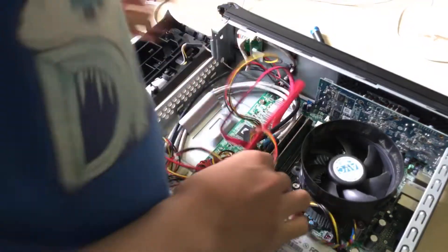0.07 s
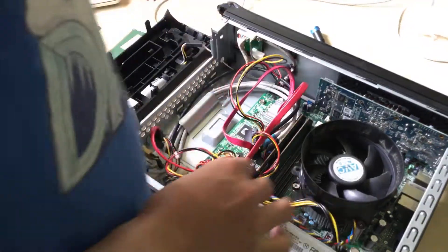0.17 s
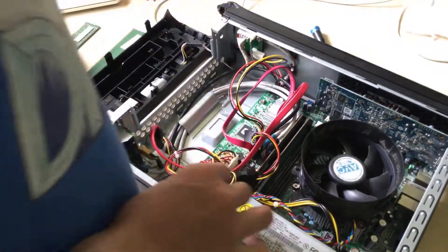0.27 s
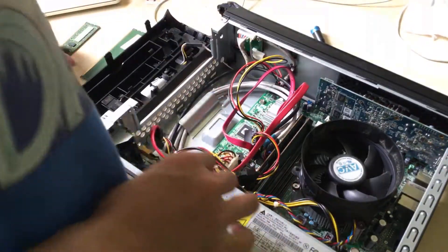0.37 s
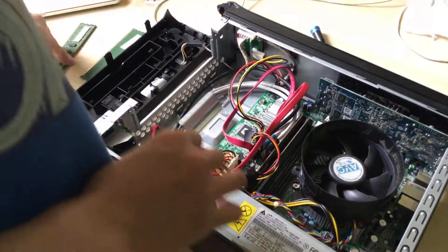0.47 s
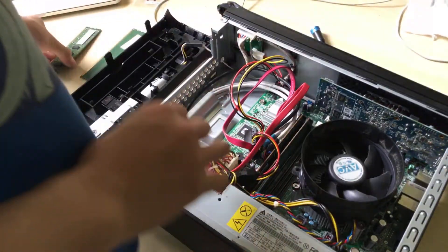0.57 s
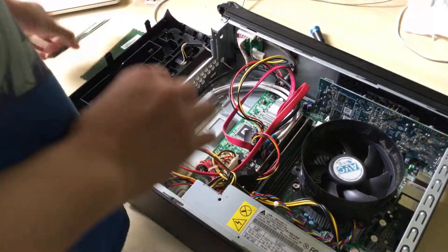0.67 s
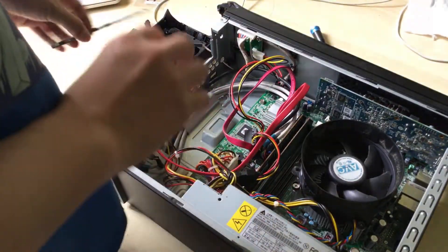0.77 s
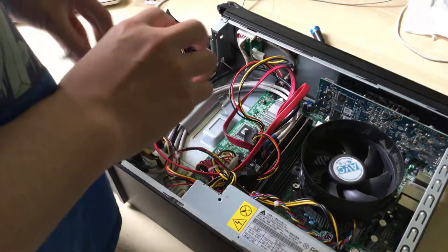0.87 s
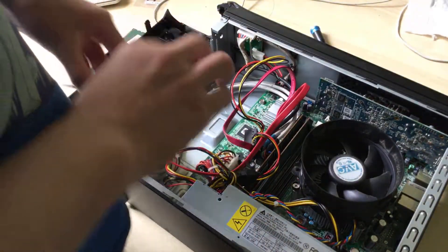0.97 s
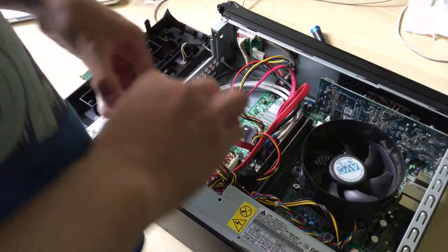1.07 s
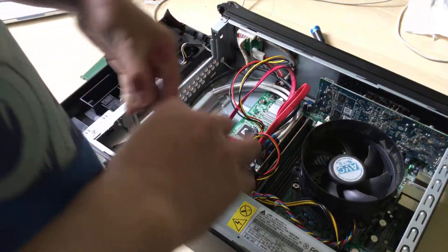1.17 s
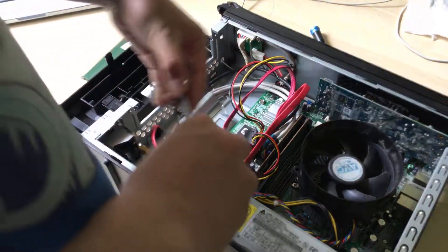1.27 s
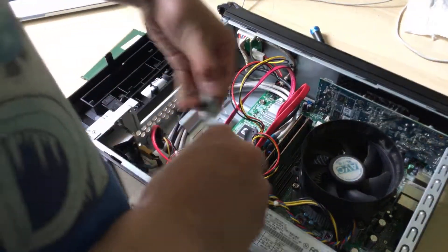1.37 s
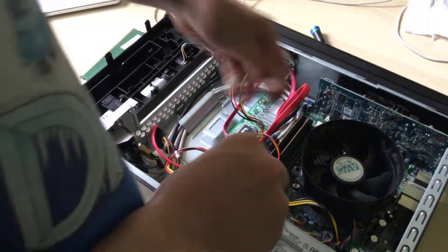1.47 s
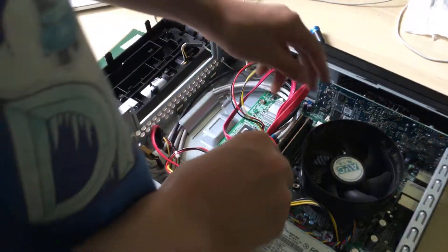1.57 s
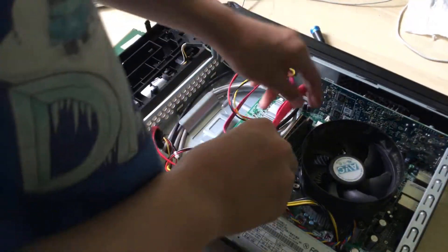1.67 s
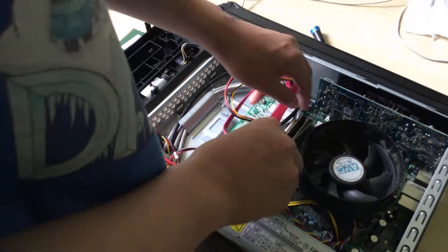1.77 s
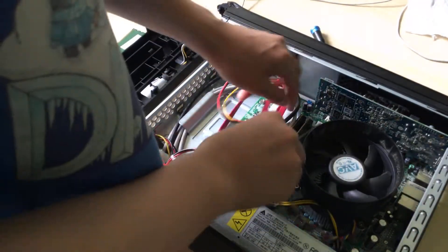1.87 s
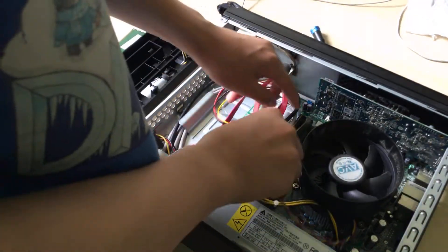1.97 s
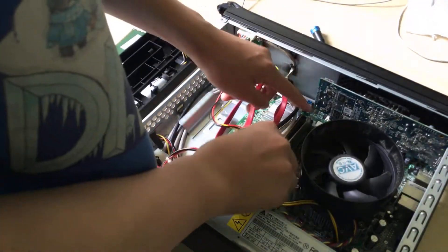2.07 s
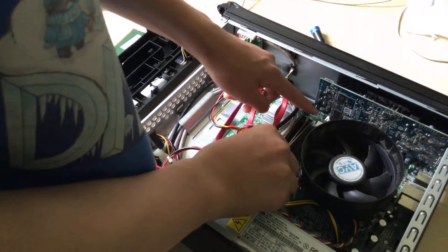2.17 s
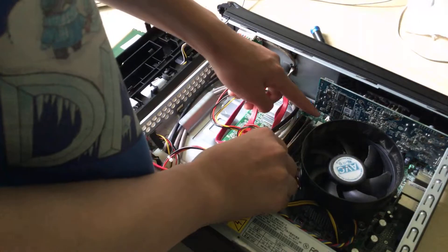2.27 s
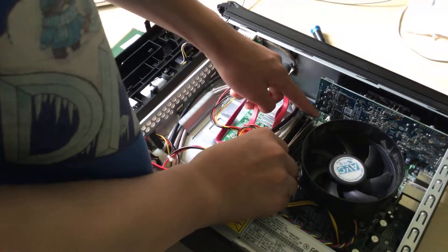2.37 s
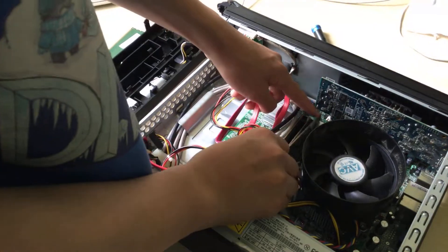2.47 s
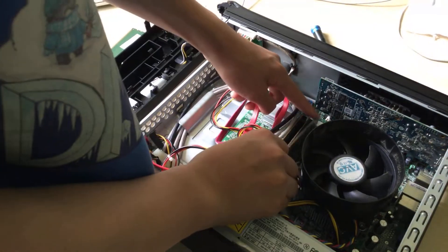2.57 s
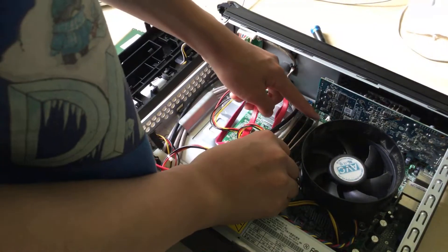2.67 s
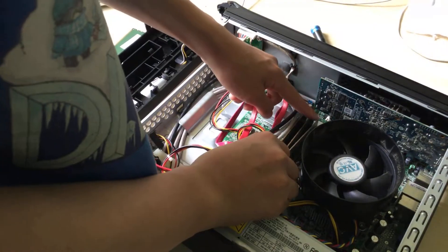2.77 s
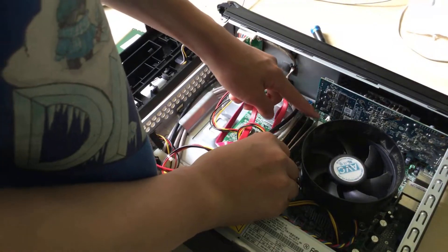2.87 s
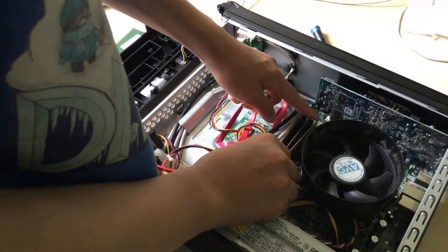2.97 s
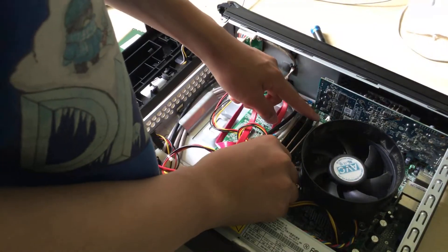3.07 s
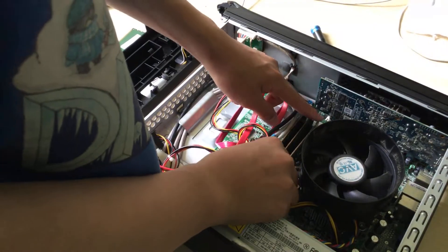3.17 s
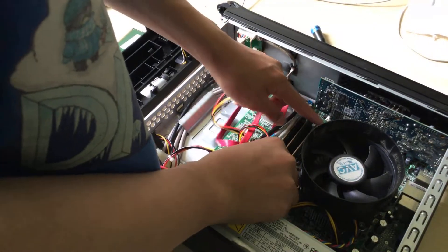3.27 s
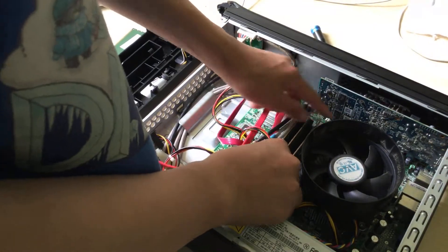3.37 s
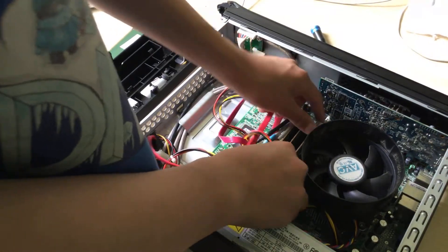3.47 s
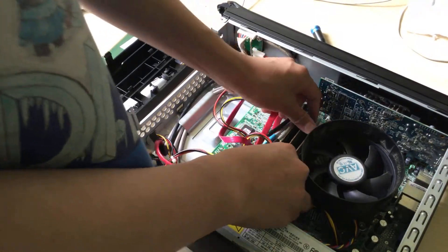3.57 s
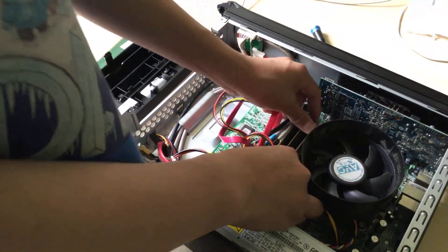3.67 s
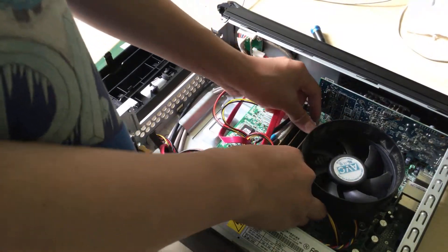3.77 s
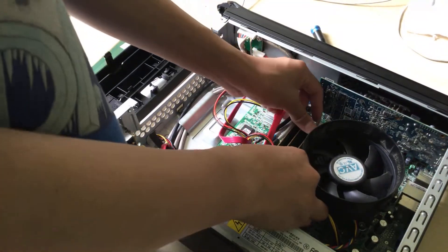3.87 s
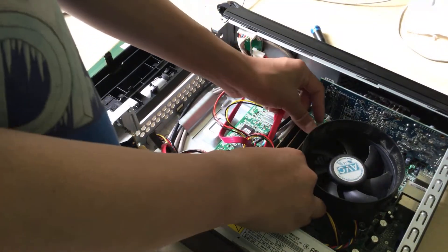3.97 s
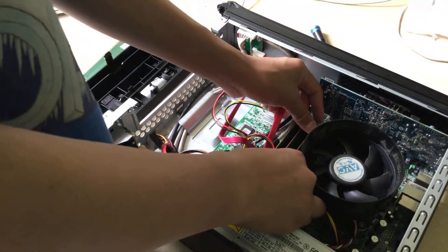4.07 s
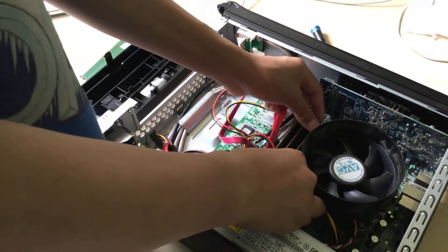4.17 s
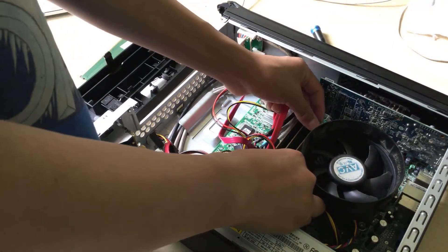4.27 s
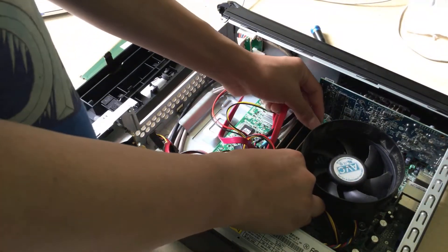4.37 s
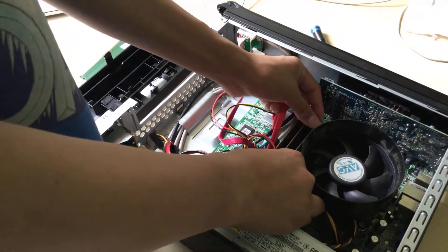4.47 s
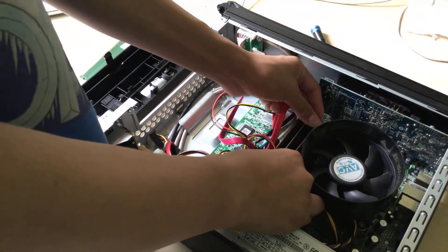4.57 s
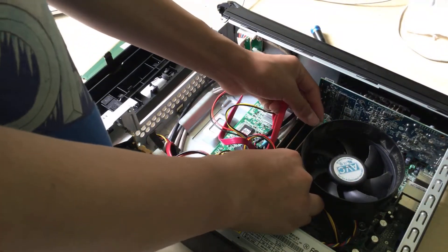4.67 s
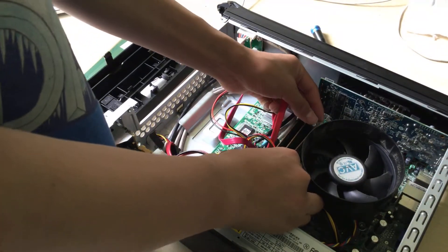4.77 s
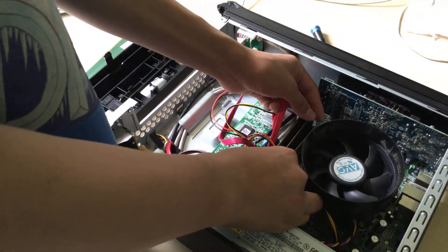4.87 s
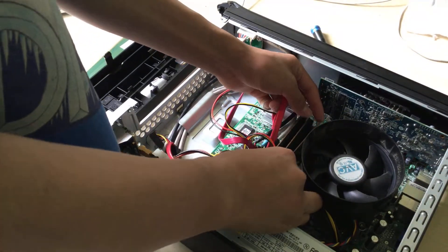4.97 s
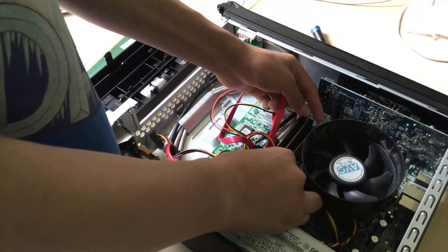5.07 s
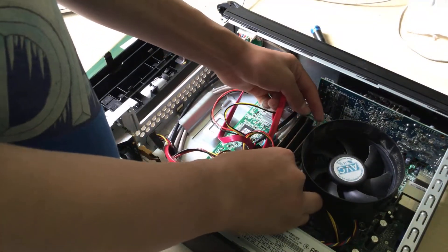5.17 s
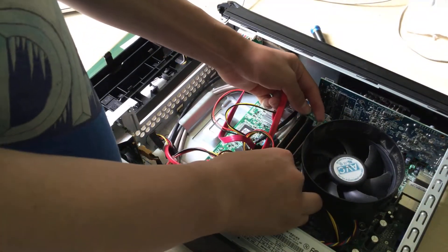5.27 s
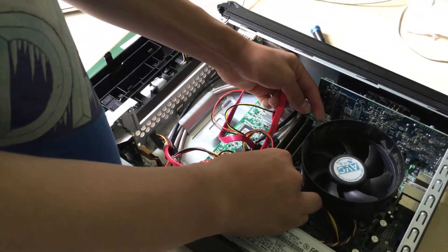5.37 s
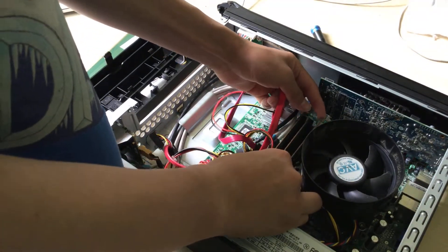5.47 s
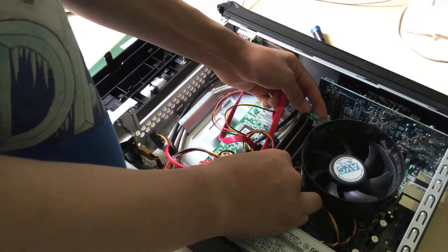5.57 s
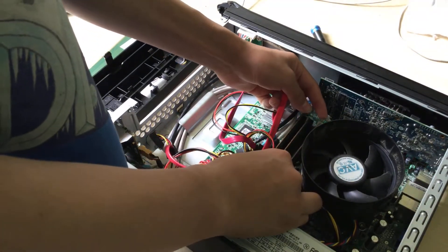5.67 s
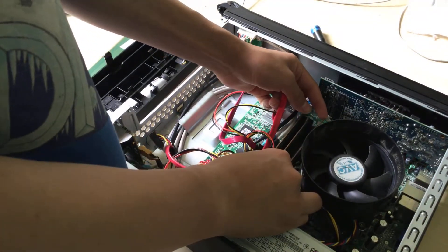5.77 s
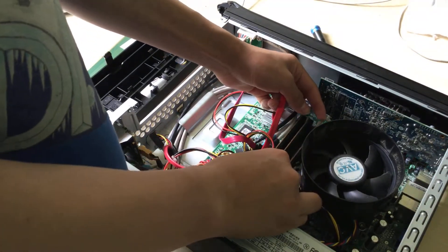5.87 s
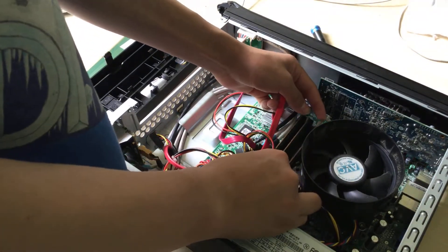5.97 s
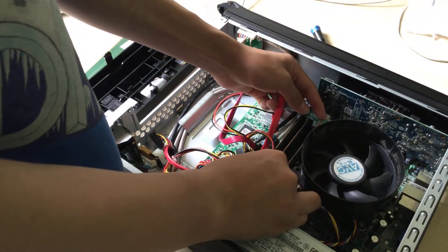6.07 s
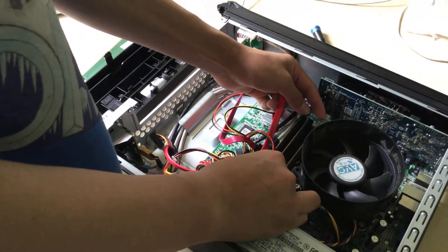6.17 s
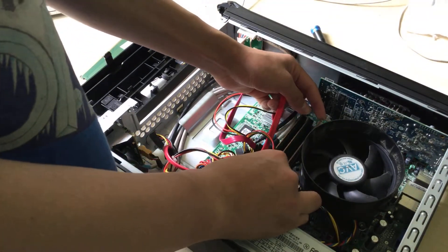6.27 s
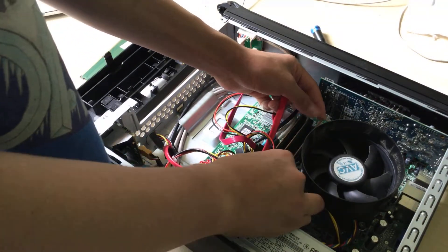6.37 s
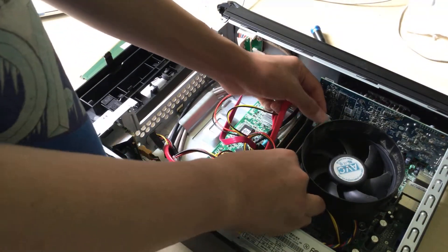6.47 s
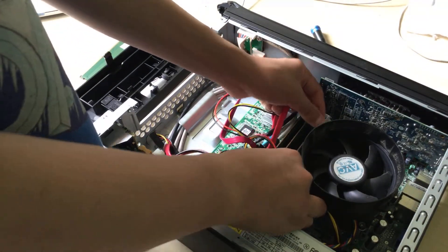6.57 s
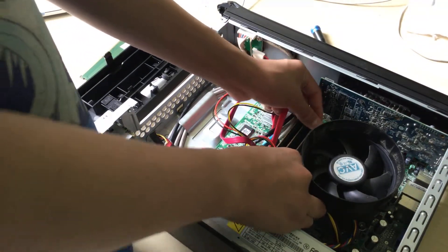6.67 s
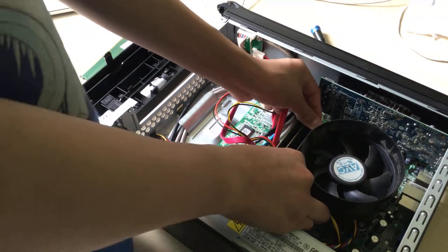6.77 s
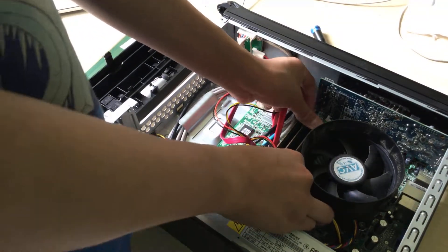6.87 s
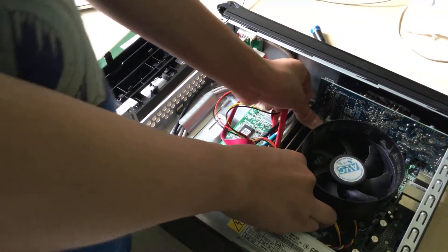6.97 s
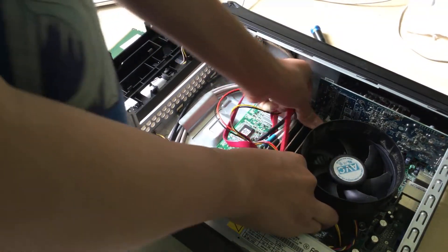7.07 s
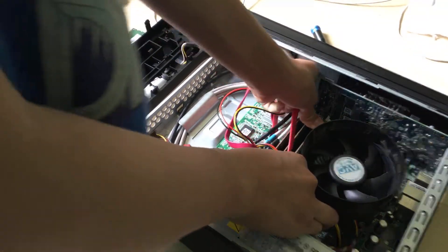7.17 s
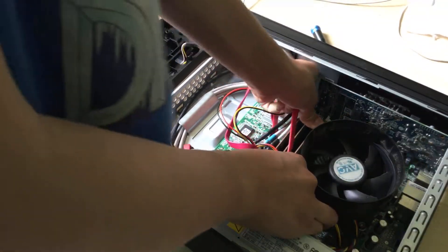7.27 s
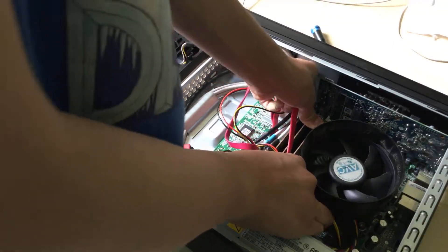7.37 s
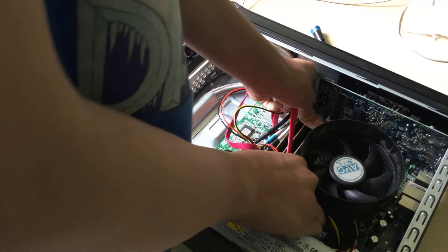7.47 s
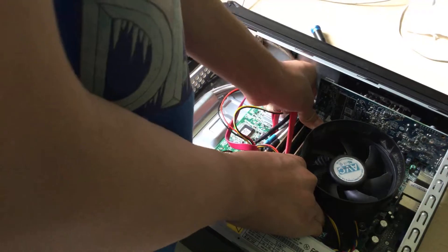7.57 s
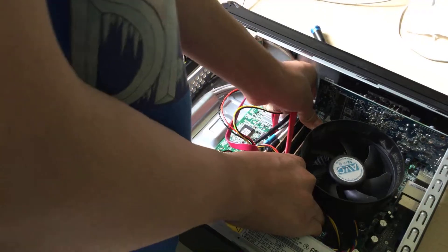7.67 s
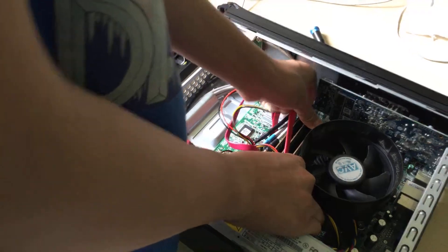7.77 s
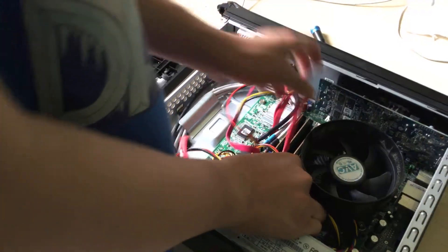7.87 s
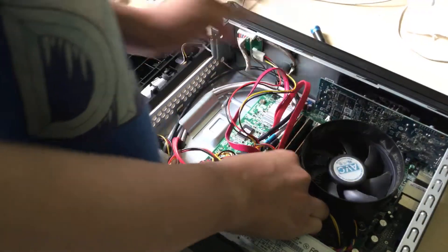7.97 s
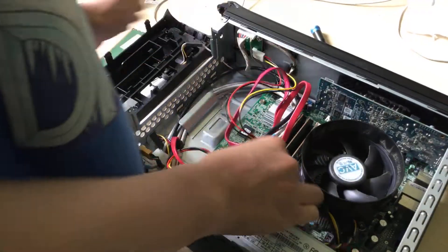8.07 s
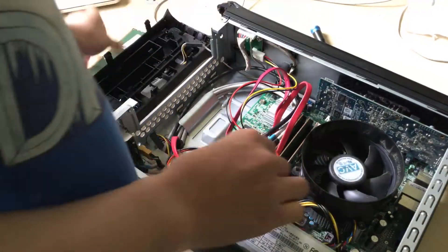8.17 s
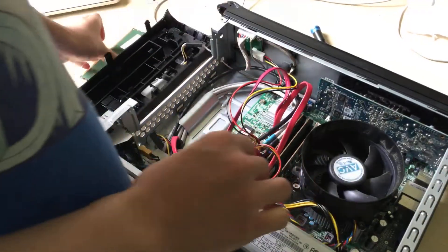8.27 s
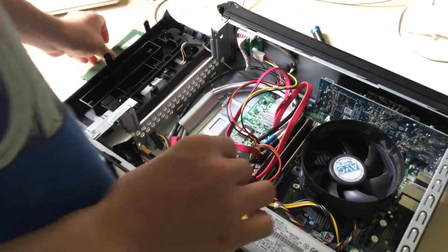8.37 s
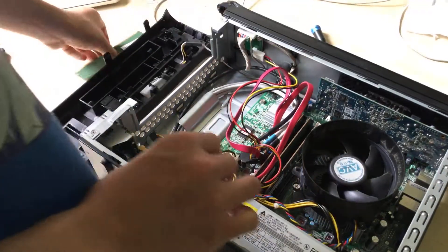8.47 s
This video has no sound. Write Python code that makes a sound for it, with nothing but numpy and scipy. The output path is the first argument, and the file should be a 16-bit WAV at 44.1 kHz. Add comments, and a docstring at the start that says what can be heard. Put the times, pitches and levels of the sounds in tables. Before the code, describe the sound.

Sharp plastic clicks and board knocks at irregular intervals in a quiet room, ending with two very loud snaps and a small rattly clatter.

```python
"""Quiet room, desk, open computer case: memory sticks are pressed into their slots.
Latches and contacts snap: noise bursts through plastic resonances. Board knocks and case thuds: struck
modes plus gritty noise. Small metal parts ping: decaying sines. Fingers, parts and sleeves brush, scuff,
slide and rustle: shaped noise. Echoes and a diffuse tail follow; air noise and a low hum lie beneath."""
import sys
import numpy as np
from scipy import signal
from scipy.io import wavfile

SR = 44100
rng = np.random.default_rng(int(sys.argv[2]) if len(sys.argv) > 2 else 0)


def put_to_file(sound):
    """Save the sound as 16-bit audio at rate SR, in the file named by the first command-line argument."""
    columns = np.atleast_2d(sound).T  # one column per channel
    safe = np.clip(columns, -1, 1)
    whole_steps = np.round(safe * 32767)
    wavfile.write(sys.argv[1], SR, whole_steps.astype(np.int16))


N = 375732

# Board modes. Each row: frequency in Hz, relative level in dB, undamped t60 in s.
BOARD_MODES = [(624, -15, 0.017), (685, 2.5, 0.054), (794, -2.5, 0.13), (903, -12.5, 0.11),
               (1017, 2, 0.075), (1140, -5, 0.18), (1270, -3.5, 0.14), (1550, 7.5, 0.019),
               (1512, -2, 0.073), (1686, 6, 0.036), (1940, -15, 0.14), (2142, -12, 0.081),
               (2444, -8.5, 0.097), (2800, -12.5, 0.053), (3025, -3, 0.025), (3407, -5.5, 0.067),
               (3870, 0, 0.017)]
# Plastic resonances of latches and slots. Each row: centre in Hz, width in Hz, relative level in dB.
LATCH_PEAKS = [(4900, 920, -12.5), (7030, 630, -16), (8430, 1090, -1.5), (11320, 920, 0.5),
               (12300, 1300, 4.5), (14530, 9900, -5)]


def from_db(db):
    """Decibels to gain."""
    return 10 ** (np.asarray(db) / 20)


def rms_one(x):
    """Scale to rms 1."""
    return x / np.sqrt(np.mean(x ** 2) + 1e-20)


def at_hz(points, hz, axis=1):
    """Interpolate a table column on a log-frequency axis."""
    points = np.array(points)
    return np.interp(np.log(hz), np.log(points[:, 0]), points[:, axis])


def band(x, low_hz, high_hz):
    """Gentle Butterworth band-pass."""
    return signal.sosfilt(signal.butter(2, [low_hz, high_hz], "band", fs=SR, output="sos"), x)


def add(out, start_s, sound):
    """Mix a sound in at its start time."""
    i = max(round(start_s * SR), 0)
    out[i:i + len(sound)] += sound[:N - i]


def drift(rate_hz):
    """Slow random wander of rms 1: noise through a double one-pole low-pass."""
    r = np.exp(-2 * np.pi * rate_hz / SR)
    wander = signal.lfilter([1], [1, -2 * r, r * r], rng.standard_normal(N + SR))
    return rms_one(wander[SR:])  # filter start-up dropped


def resonances(x, peaks, tilt_db=0):
    """Parallel two-pole resonances of alternating sign; tilt in dB per octave about 10 kHz."""
    out = 0
    for k, (hz, width_hz, db) in enumerate(peaks):
        r = np.exp(-np.pi * width_hz / SR)
        poles = [2, -4 * r * np.cos(2 * np.pi * hz / SR), 2 * r * r]
        ring = signal.lfilter([1 - r * r, 0, r * r - 1], poles, x)
        out = out + (-1) ** k * from_db(db + tilt_db * np.log2(hz / 10000)) * ring
    return out


def snaps(rise_s=0.00053, chatter_db=-20, chatter_t60_s=0.059):
    """Plastic cracks for a few ms, contacts chatter weaker and longer; no two latches ring alike."""
    # Each row: start in seconds, peak of the bright share in dB, dull share relative to it in dB, t60 in s.
    snap_rows = [(0.016, -53, -15, .015), (0.134, -40, -23, 0.012), (.163, -52, -16, .015),
                 (0.192, -32.5, -5.5, 0.018), (0.5037, -52.5, 7, .015), (.8, -59, -4, 0.0052),
                 (.927, -58, -8, 0.0051), (.996, -53.5, -8, 0.0054), (1.37, -50, -14, 0.0054),
                 (1.379, -40, -14, 0.0087), (1.558, -59, 10, 0.014), (1.619, -53, 8, 0.0054),
                 (1.6353, -24.5, 3, 0.029), (2.002, -49, -11, .02), (2.029, -32.5, -20, 0.05),
                 (2.06, -44, 3, .015), (2.125, -45, -15, .02), (2.159, -48.5, -2, .02),
                 (2.2235, -22.5, -7.5, 0.021), (2.3724, -41, -26, 0.02), (3.1395, -51, -15, .015),
                 (3.2333, -53, -9, 0.017), (3.454, -45.5, -5, .015), (3.476, -38.5, -5.5, 0.018),
                 (3.55, -38.5, -12.5, 0.024), (4.031, -51.5, -29, 0.028), (4.5257, -54, -0.5, 0.016),
                 (4.78, -51.5, -20, .015), (5.309, -38, -4.5, 0.014), (5.9215, -31, -21, 0.032),
                 (6.675, -54, -13, .015), (6.698, -28, -14, .02), (7.253, -7, -18.5, 0.014),
                 (7.5167, -42.5, -8.5, 0.024), (7.634, -5, -14, 0.01), (7.9384, -44, -2.5, 0.016),
                 (8.2893, -46.5, 0, .015), (8.3757, -37.5, -3, 0.017), (8.3802, -24.5, -4.5, 0.017),
                 (8.389, -33.5, 6, 0.014)]
    grit_db, dull_haste, tilt_db = 3, 1.1, 1.5  # haste: factor on the dull share's decay in dB
    out, t = np.zeros(N), np.arange(SR // 8) / SR
    for start_s, peak_db, dull_db, t60_s in snap_rows:
        decay = from_db(-60 * t / t60_s) + from_db(chatter_db - 60 * t / chatter_t60_s)
        burst = decay * (1 - np.exp(-t / rise_s)) ** 2
        noise = rng.standard_normal((2, len(t)))
        steps = rng.standard_normal(len(t) // 16 + 1).repeat(16)[:len(t)]  # new level every 16 samples
        crackle = noise * from_db(grit_db * steps) * [burst, burst ** dull_haste]
        latch = [(hz * (1 + .015 * rng.standard_normal()), width_hz, db + 2.5 * rng.standard_normal())
                 for hz, width_hz, db in LATCH_PEAKS]
        bright = resonances(crackle[0], latch, tilt_db)
        dull = band(crackle[1], 2100, 8300)
        crack = bright / abs(bright).max() + from_db(dull_db) * dull / abs(dull).max()
        add(out, start_s, from_db(peak_db) * crack)
    return out


def blows(events, modes, damping, fall_db, fall_change, grit_t60_s, rise_s, kick_db, kick_s,
          rattle_db=5.0, bend=.02, spread=.4):
    """A blow rings detuned, damped modes, strongest near its own pitch, with broad contact grit.

    damping: 1 = free. fall_db: level fall per octave from the pitch, for a blow at -40 dB.
    fall_change: change of that fall per dB harder.
    """
    crunch_db, crunch_octaves = -6, 1.064  # grit level under the ring; half-width about the pitch
    out, t = np.zeros(N), np.arange(SR // 4) / SR
    onset = (1 - np.exp(-t / rise_s)) ** 2  # soft contact, no click
    contact = onset * from_db(kick_db * np.exp(-t / kick_s))  # boost while the parts touch
    focus = spread + (1 - spread) * np.exp(-t / (2 * kick_s))  # ring soon spreads to other modes
    free_hz, mode_db, t60_s = np.array(modes).T[:, :, None]
    for start_s, peak_db, centre_hz in events:
        octave_fall_db = fall_db + fall_change * (peak_db + 40)
        scatter, detune, lag = rng.standard_normal((3, *mode_db.shape))
        hz = free_hz * (1 + bend * detune)
        distance_db = octave_fall_db * focus * abs(np.log2(hz / centre_hz))
        level_db = mode_db + 2.47 * scatter - distance_db - 60 * damping * t / t60_s
        ring = np.sum(from_db(level_db) * np.sin(2 * np.pi * hz * t - 0.85 * lag), axis=0) * contact
        # loose parts rattle along
        shake = np.interp(t, t[::60], rng.standard_normal(len(t[::60])))
        ring = ring * from_db(rattle_db * shake * (1 - np.exp(-t / kick_s)))
        grit = rng.standard_normal(len(t)) * from_db(rattle_db * shake - 60 * t / grit_t60_s)
        edges_hz = centre_hz / 2 ** crunch_octaves, centre_hz * 2 ** crunch_octaves
        grit = band(band(grit * onset, *edges_hz), *edges_hz)
        blow = ring / abs(ring).max() + from_db(crunch_db) * grit / abs(grit).max()
        add(out, start_s, from_db(peak_db) * blow)
    return out


def board_knocks():
    """The circuit board is struck: short, heavily damped modes."""
    # Each row: start in seconds, peak of the ring before the band-pass in dB, strongest pitch in Hz.
    knock_rows = [(.195, -24.5, 2580), (.202, -25, 1050), (.505, -37.5, 2000), (.633, -53, 1890),
                  (1.553, -56.5, 1720), (1.619, -44.5, 1920), (1.637, -28, 2970), (1.643, -40, 805),
                  (1.978, -54.5, 1580), (2.029, -39, 1320), (2.062, -24.5, 1440), (2.228, -18.5, 1680),
                  (2.236, -50, 1500), (2.38, -46, 900), (2.822, -49, 1580), (3.139, -40, 1420),
                  (3.292, -46, 670), (3.492, -43, 845), (3.556, -43.5, 890), (4.032, -47.5, 1720),
                  (4.532, -51.5, 1290), (4.575, -53.5, 1190), (4.783, -43.5, 1260), (4.818, -50.5, 1110),
                  (5.311, -39.5, 1790), (5.552, -50.5, 1590), (5.575, -54, 1060), (5.925, -48.5, 1680),
                  (6.701, -24.5, 1330), (6.945, -54, 1020), (7.253, -13, 1640), (7.262, -33, 895),
                  (7.522, -38.5, 990), (7.635, -17.5, 1800), (7.642, -23.5, 776), (7.941, -49.5, 780),
                  (8.03, -50, 599), (8.287, -48, 710), (8.387, -43, 3100), (8.476, -44, 1890)]
    knocks = blows(knock_rows, BOARD_MODES, damping=2.5, fall_db=13.0, fall_change=-0.18,
                   grit_t60_s=0.012, rise_s=0.00073, kick_db=17.0, kick_s=.0035)
    return band(knocks, 350, 11000)


def case_thuds():
    """The case rocks on the desk: low modes, softer contact."""
    # Each row: start in seconds, peak of the ring in dB, strongest pitch in Hz.
    thud_rows = [(.194, -33.5, 269), (.382, -44, 356), (.415, -46.5, 388), (.5, -45, 154),
                 (1.31, -54.5, 334), (1.639, -39, 133), (1.685, -42.5, 119), (2.061, -39, 440),
                 (2.228, -41, 324), (2.386, -46.5, 136), (3.05, -51, 440), (3.465, -41, 137),
                 (3.495, -44, 250), (4.522, -53, 131), (4.777, -48.5, 280), (5.324, -53.5, 149),
                 (5.6, -53, 136), (5.925, -54, 154), (6.7, -39, 460), (6.758, -45, 129), (7.253, -43, 383),
                 (7.275, -36.5, 96), (7.633, -45, 500), (7.664, -40, 132), (7.936, -37.5, 254),
                 (8.279, -39, 222), (8.319, -45, 332), (8.377, -31.5, 105)]
    # Each row: mode frequency in Hz, relative level in dB, undamped t60 in s.
    case_modes = [(52.6, -11, 0.57), (75, 0.5, 0.26), (134.4, 2, 0.27), (168.3, 1, 0.17),
                  (198.3, -4.5, 0.21), (241, -6, 0.15), (282, 6, 0.085), (330.7, 3, 0.081),
                  (433.7, -3.5, 0.21), (503, -3.5, 0.045)]
    # negative grit t60: the grit swells to the end of its quarter-second window
    return blows(thud_rows, case_modes, damping=1.19, fall_db=13.5, fall_change=0.2,
                 grit_t60_s=-0.02, rise_s=0.0047, kick_db=4.0, kick_s=0.0091, rattle_db=2.0)


def pings(t60_s=0.062):
    """A small metal part is struck sharply: one thin decaying mode."""
    # Each row: start in seconds, initial level in dB, pitch in Hz.
    ping_rows = [(8.383, -41, 4520), (8.476, -43, 6110)]
    out, t = np.zeros(N), np.arange(SR // 4) / SR
    for start_s, db, hz in ping_rows:
        add(out, start_s, from_db(db - 60 * t / t60_s) * np.sin(2 * np.pi * hz * t))
    return out


def touch(rows, fade_s):
    """One gain track per dB column: each touch fades in, holds and fades out."""
    t, levels = np.arange(N) / SR, 0
    for start_s, length_s, *dbs in rows:
        inside_s = np.minimum(t - start_s, start_s + length_s - t)
        levels = levels + from_db(dbs)[:, None] * np.clip(inside_s / fade_s + .5, 0, 1)
    return levels


def rubs():
    """Skin hisses in the treble and drags grains through board, loose stick and case panel."""
    # Fingers brushing. Each row: start in seconds, length in s, skin hiss in dB, board scrape in dB.
    brush_rows = [(0.0, 0.049, -64, -71.5), (.085, 0.19, -72, -80), (.176, 0.02, -77, -62),
                  (.29, 0.12, -86, -67), (.488, 0.084, -88, -59.5), (.612, 0.084, -68.5, -59.5),
                  (1.219, 0.035, -66.5, -94), (1.34, 0.033, -71, -102), (1.504, 0.1, -70, -96),
                  (1.988, 0.1, -73, -64), (2.075, .1, -69, -75), (3.09, 0.082, -74, -72.5),
                  (3.457, 0.057, -61, -68), (3.5, 0.043, -66, -70.5), (4.52, 0.045, -77, -77),
                  (5.02, 0.025, -86, -71), (5.543, 0.05, -64, -72), (6.666, 0.074, -58.5, -54),
                  (6.724, 0.039, -87, -61), (6.918, 0.074, -63.5, -69), (7.195, 0.048, -71, -66),
                  (7.896, 0.091, -66, -68), (8.367, 0.077, -55.5, -62), (8.474, 0.039, -70, -63)]
    # A loose stick scuffs on the desk. Each row: start in seconds, length in s, level in dB.
    scuff_rows = [(.488, 0.038, -61.5), (.612, 0.063, -55.5), (6.918, 0.045, -70), (8.367, 0.069, -73),
                  (8.474, 0.02, -52.5)]
    # Slow breathy slides on the case. Each row: start in seconds, length in s, level before flutter in dB.
    slide_rows = [(0.0, 0.026, -58), (.36, 0.091, -63.5), (3.73, 0.13, -76), (6.75, 0.25, -69),
                  (7.05, 0.38, -68), (8.03, 0.4, -67)]
    # Loose stick resonances. Each row: centre in Hz, width in Hz, relative level in dB.
    stick_peaks = [(1121, 52, 4), (1857, 110, 1.5), (2600, 110, -7), (4200, 390, -12.5), (6400, 290, -3),
                   (10800, 240, -13), (13100, 320, -12)]
    # Case panel resonances. Each row: centre in Hz, width in Hz, relative level in dB.
    panel_peaks = [(1680, 130, -1.5), (3170, 32, -12.5), (3600, 350, -15.5)]
    hiss, scrape = touch(brush_rows, fade_s=0.026)
    scuff, = touch(scuff_rows, fade_s=0.029)
    slide, = touch(slide_rows, fade_s=0.0505) * from_db(3.0 * drift(8.9))
    grains = rng.standard_normal((4, N)) * from_db(3.76 * drift(60))
    held_board = [(hz, 18 / t60_s, db) for hz, db, t60_s in BOARD_MODES]  # held parts ring briefly
    return (hiss * rms_one(resonances(grains[0], LATCH_PEAKS))
            + scrape * rms_one(resonances(grains[1], held_board))
            + scuff * rms_one(resonances(grains[2], stick_peaks))
            + slide * rms_one(resonances(grains[3], panel_peaks)))


def rustle(lumps_db=4.0, under_db=-4):
    """Hands and sleeves on the case: lumpy low noise that comes and goes."""
    # Each row: time in seconds, level before under_db in dB.
    rustle_points = [(0.0, -61), (0.4, -66), (0.73, -74.5), (1.26, -92), (2.01, -61.5), (2.18, -55),
                     (2.54, -79.5), (3.37, -67), (4.25, -75.5), (6.57, -74.5), (7.57, -61.5), (7.74, -65),
                     (8.28, -70), (8.52, -59)]
    time_s, db = np.transpose(rustle_points)
    lumps = from_db(lumps_db * drift(14.7))
    noise = rms_one(lumps * band(rng.standard_normal(N), 200, 1000))
    return from_db(np.interp(np.arange(N) / SR, time_s, db) + under_db) * noise


def room(bodies, cracks, build_s=0.002):
    """Near echoes, then a tail dying band by band: bodies keep their pitch, cracks smear into noise."""
    # Tail. Each row: frequency in Hz, t60 in s, relative level in dB.
    tail_bands = [(140, 0.76, -18), (479, 0.39, -3), (1536, 0.39, -9), (4400, 0.37, -4), (8240, 0.29, -10),
                  (14200, 0.24, -18)]
    # Desk and wall. Each row: delay in seconds, level before the band-pass in dB.
    echo_rows = [(.0085, -4), (.018, -9)]
    t, white = np.arange(SR // 2) / SR, rng.standard_normal((2, N))
    edges_hz = 45 * 2 ** np.arange(0, 8.7, 1 / 3)
    tail, smear = 0, 0
    for k, (low, high) in enumerate(zip(edges_hz, edges_hz[1:])):
        hz = np.sqrt(low * high)
        decay = from_db(at_hz(tail_bands, hz, axis=2) - 60 * t / at_hz(tail_bands, hz))
        decay = decay * (1 - np.exp(-t / build_s)) / np.sqrt(SR / 100)
        tail = tail + band(rng.standard_normal(len(t)), low, high) * decay
        energy = signal.fftconvolve(band(cracks, low, high) ** 2, decay ** 2)[:N]
        smear = smear + np.sqrt(abs(energy)) * rms_one(band(white[k % 2], low, high))
    direct = bodies + cracks
    echoes = sum(from_db(db) * np.pad(direct, (round(delay_s * SR), 0))[:N] for delay_s, db in echo_rows)
    return direct + signal.fftconvolve(bodies, tail)[:N] + smear + band(echoes, 520, 4200)


def room_tone(air_db=-65, hum_hz=125.7, hum_db=-70.5):
    """Air and microphone noise in half-octave bands, with a wavering low hum."""
    # Each row: frequency in Hz, relative noise density in dB.
    air_spectrum = [(15, -43), (25, -9), (92, 3.5), (150, 2), (339, -3.5), (496, -10.5), (706, -16),
                    (902, -19.5), (1730, -18), (2600, -23.5), (12200, -29), (15200, -30.5), (16500, -49)]
    edges_hz, white = 24 * 2 ** np.arange(0, 10, .5), rng.standard_normal((2, N))
    air = 0
    for k, (low, high) in enumerate(zip(edges_hz, edges_hz[1:])):
        level_db = at_hz(air_spectrum, np.sqrt(low * high)) + 0.49 * drift(1)
        air = air + from_db(level_db) * band(white[k % 2], low, high)
    phase = 2 * np.pi * hum_hz * np.arange(N) / SR + 0.97 * drift(5.6)
    hum = np.sin(phase) * from_db(hum_db + 1.0 * drift(3.5))
    return from_db(air_db) * rms_one(air) + hum


def scene():
    """Everything at the case sounds in the room, over the room tone."""
    bodies = board_knocks() + case_thuds() + pings() + rubs() + rustle()
    return (room(bodies, snaps()) + room_tone())[None]


def record(dry, cutoff_hz=16500):
    """The small microphone drops the deep bass; the top is cut steeply."""
    thin = signal.sosfilt(signal.butter(2, 45, "high", fs=SR, output="sos"), dry)
    return signal.sosfilt(signal.cheby2(14, 60, cutoff_hz, fs=SR, output="sos"), thin)


dry = scene()
out = record(dry)
put_to_file(out)
```